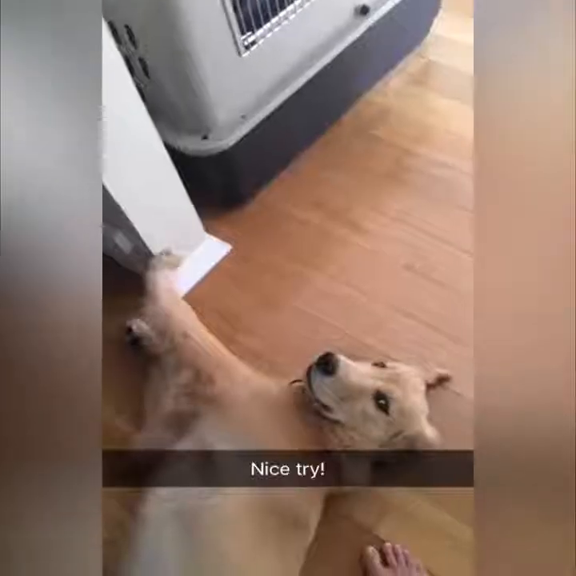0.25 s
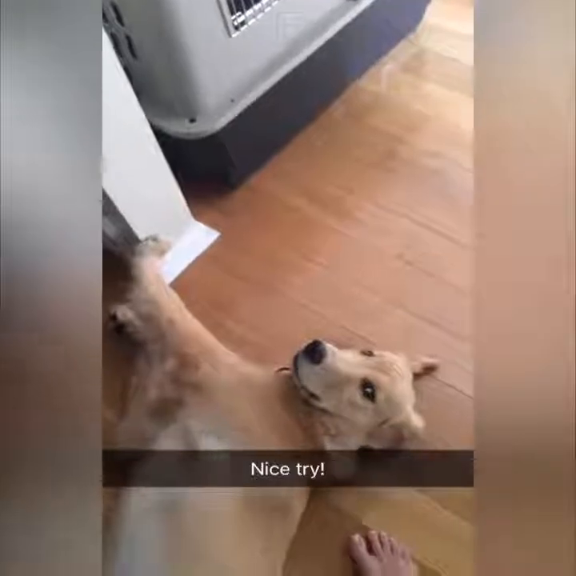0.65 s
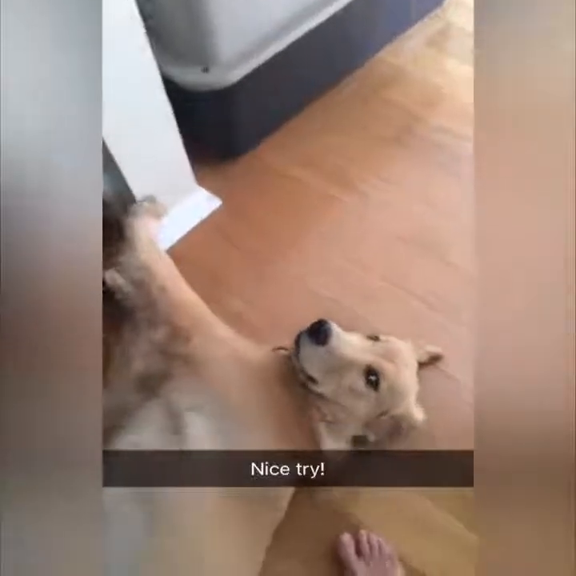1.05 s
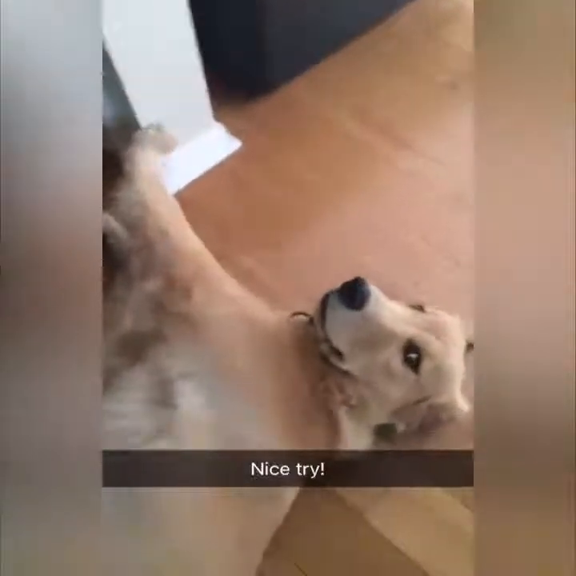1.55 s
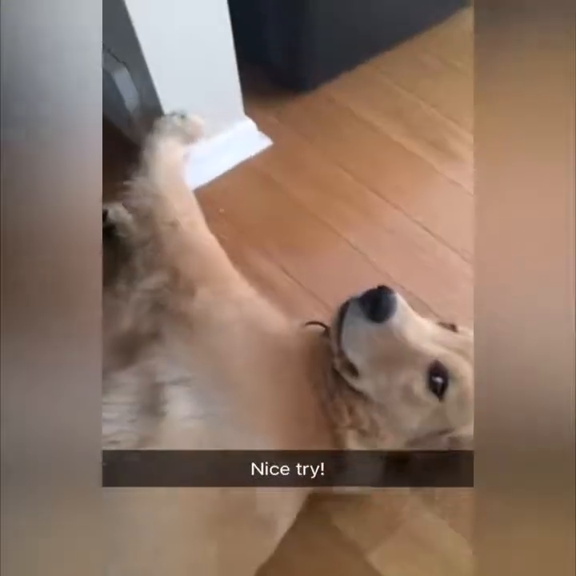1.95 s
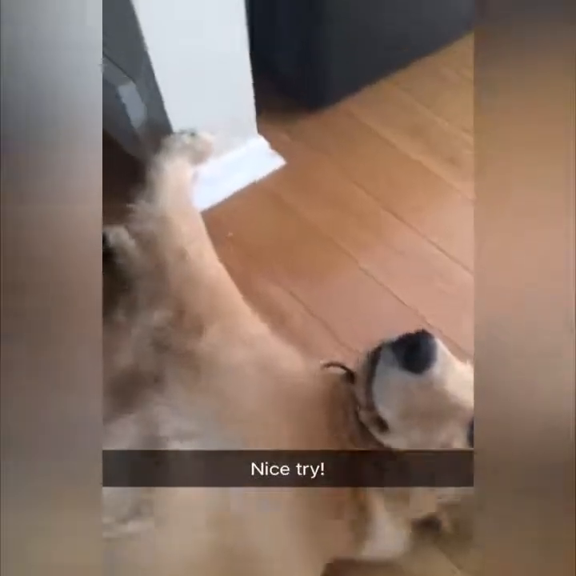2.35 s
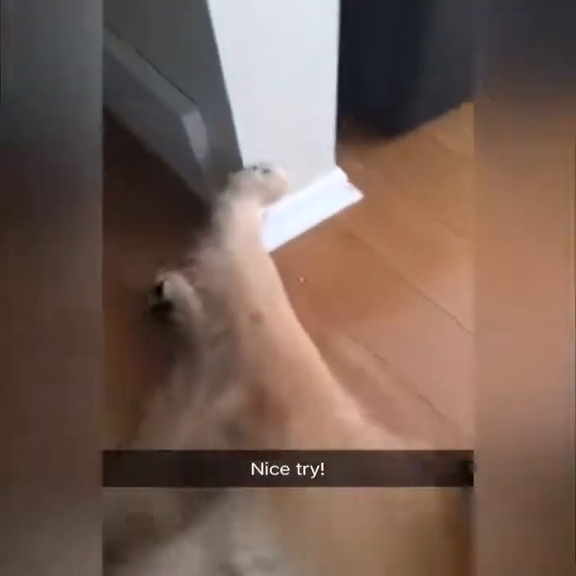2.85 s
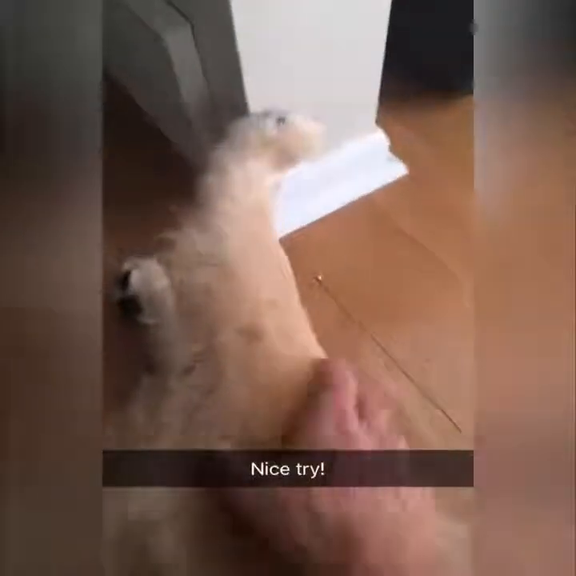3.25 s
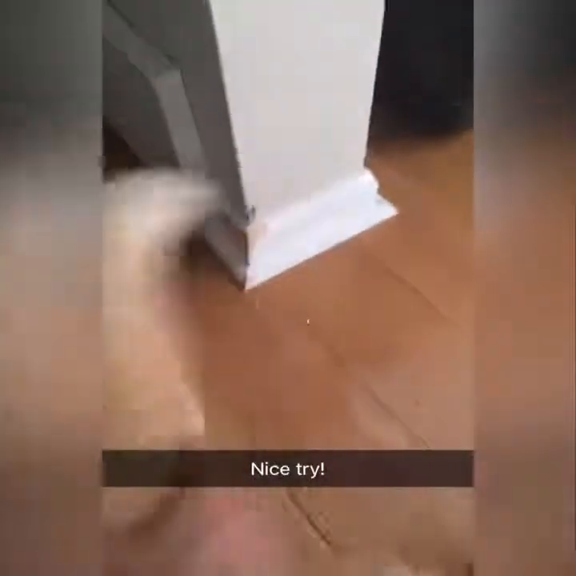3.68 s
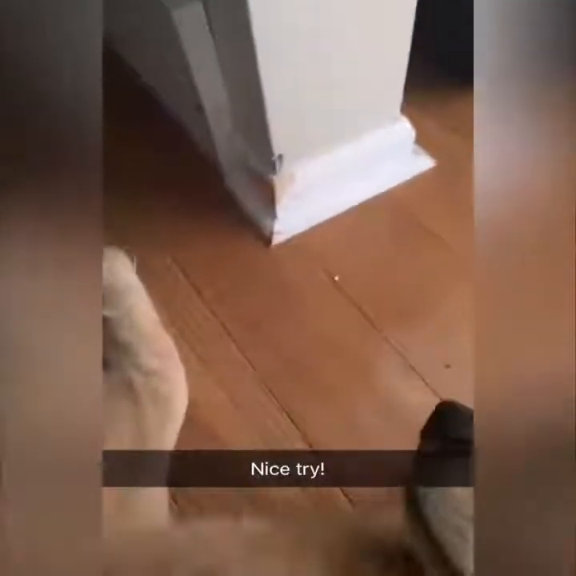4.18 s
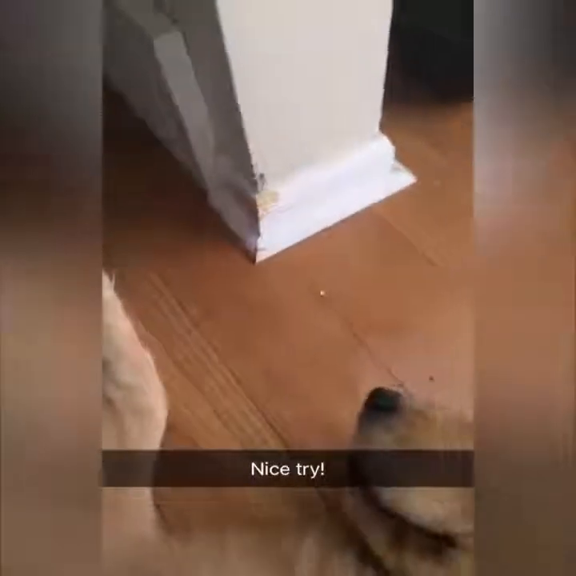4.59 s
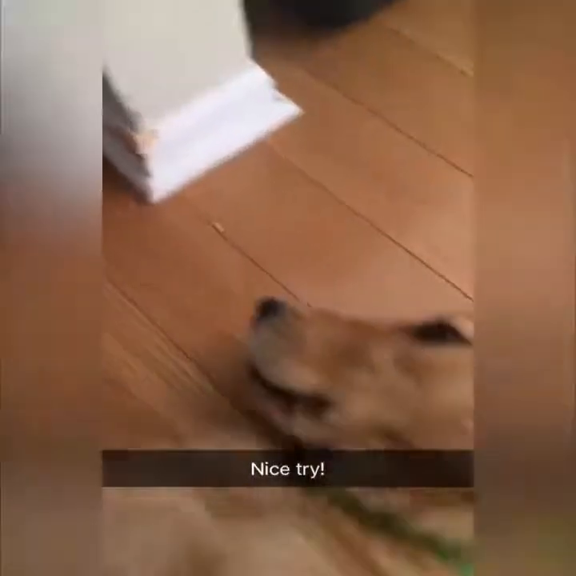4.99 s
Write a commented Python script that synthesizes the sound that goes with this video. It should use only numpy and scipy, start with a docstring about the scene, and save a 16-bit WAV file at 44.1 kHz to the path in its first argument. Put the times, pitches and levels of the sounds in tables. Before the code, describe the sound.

A dog's coat hisses along a hardwood floor in strokes, with tiny claw ticks, then sharp claw scratches and soft paw knocks indoors.

```python
"""A dog's coat hisses along a hardwood floor in strokes as the dog is rubbed and shifted about in a small room.
The hiss and the dull rumble of its weight are made of countless tiny random slips, each layer given its colour.
Claws scratch in short bursts of slips and tick as fast-dying tones; paws knock on the floor and the door frame
as low pulses with a thud. Short reflections, low room tones and quiet air noise surround it all."""
import sys
import numpy as np
from scipy import signal
from scipy.fft import rfft, irfft, next_fast_len
from scipy.io import wavfile

SR = 44100
rng = np.random.default_rng(int(sys.argv[2]) if len(sys.argv) > 2 else 0)


def to_wav(s):
    """Save 16-bit WAV."""
    ch = np.atleast_2d(s).T  # columns
    pcm = np.round(np.clip(ch, -1, 1) * 32767)  # PCM
    wavfile.write(sys.argv[1], SR, pcm.astype(np.int16))


N = 230508
TIME = np.arange(N) / SR  # seconds

# Quiet air of the room, spectrum: (pitch [Hz], relative level [dB])
AIR_SPECTRUM = [(40, -31), (90, -8), (160, 5.5), (240, 5), (340, -11.5), (600, -11), (1000, -2),
                (2000, -12.5), (5200, -13.5), (7500, -8), (11000, -44), (15000, -19)]

# The body dragging on the boards, before one shared trim: (time [s], level [dB])
DRAG_LEVELS = [(0.26, -49.5), (0.71, -47.5), (1.07, -50), (1.39, -47), (2.15, -48), (2.35, -52.5),
               (2.51, -50.5), (2.69, -50.5), (3.19, -61), (3.95, -62), (4.16, -64.5), (4.42, -68.5),
               (5.05, -65.5), (5.22, -59)]
# Spectra of the dragging weight and of the settling head: (pitch [Hz], relative level [dB])
RUMBLE_SPECTRUM = [(25, -29), (80, -28), (105, -19), (150, -3), (200, -7.5), (250, -0.5), (320, -1.5),
                   (400, -3.5), (560, -7), (780, -12.5), (1200, -32.5), (2000, -26)]
SETTLE_SPECTRUM = [(450, -12), (750, -8.5), (1150, -2), (1600, -5), (2200, -15), (4000, -19)]

# Strokes of the coat over the boards, each a push that builds, holds and lets go:
# (start [s], rise [s], hold [s], release [s], hiss [dB], coarse grit [dB], fine hair [dB])
COAT_STROKES = [ (0.39, 0.062, .01, 0.027, -52.5, -68, -60), (0.724, 0.055, 0.055, 1, -42.5, -59, -45.5),
                (0.765, 0.44, .24, 0.84, -33.5, -47, -55), (1.642, 0.082, 0.28, .25, -36, -46, -43.5),
                (2.07, 0.045, 0.037, .13, -57, -46, -51.5), (2.155, 0.028, 0.061, 0.44, -64.5, -59.5, -73),
                (2.48, 0.057, .015, 0.053, -37.5, -50, -50), (2.548, 0.033, 0.18, 0.044, -39.5, -44, -43),
                (2.758, 0.02, 0.43, 1, -52.5, -54, -50.5), (2.878, 0.055, 0.064, 0.054, -46, -57, -49.5),
                (3.225, 0.036, 0.21, 0.1, -56.5, -63, -51), (3.59, 0.11, .1, 0.67, -64.5, -65, -80),
                (3.741, 0.022, 0.011, .02, -44, -60, -45), (4.025, .03, 0.032, 0.044, -60, -68, -65),
                (4.555, 0.007, 0.017, 0.045, -63, -56.5, -57), (4.593, 0.024, 0.12, .1, -80, -73, -73),
                (4.688, .004, 0.0058, 0.021, -72, -77, -58), (4.798, 0.19, .25, .17, -66, -70.5, -64)]
# Faint stir of the coat between strokes: (hiss [dB], grit [dB], hair [dB])
RESTING_COAT_DB = [-69, -73.5, -76.5]
# Spectra of the coat's hiss, grit and fine hair, and of loose fur: (pitch [Hz], relative level [dB])
HISS_SPECTRUM = [(4500, -58), (5300, -11), (6200, -2), (7900, 6), (9200, 3.5), (10900, 2.5), (11400, -5.5),
                 (11900, -105)]
GRIT_SPECTRUM = [(600, -17), (900, -9.5), (1250, -11.5), (1600, -3), (2500, 0.5), (3500, -4.5),
                 (4400, -2.5), (5100, -8.5), (7000, -15)]
HAIR_SPECTRUM = [(7500, -51), (10000, 8.5), (11800, 6.5), (12600, 8), (14200, 8), (15500, 4)]
SWISH_SPECTRUM = [(900, -8), (1250, -15), (1750, -0.5), (2400, -3), (3400, -4.5), (5200, -6.5),
                  (6500, -1.5), (7900, 0), (10500, -3), (12500, -6.5), (15000, -15)]

# Dry ticks of a claw tip, before one shared boost: (start [s], level [dB], pitch of the wood [Hz])
CLAW_TICKS = [(0.8479, -26, 1970), (0.9030, -35, 1700), (0.9962, -28, 2320), (1.065, -29.5, 1210),
              (1.1136, -25, 2550), (1.1356, -26.5, 1570), (1.1590, -30.5, 1880), (1.194, -31.5, 2430),
              (1.5412, -33, 1620)]

# Paw knocks: (start [s], level [dB], pitch of the struck spot [Hz], time to the peak [s], dull thud [dB])
PAW_KNOCKS = [ (1.934, -42, 279, 0.009, -39), (2.588, -40, 225, 0.0069, -34.5),
              (2.639, -37, 189, 0.0083, -57), (2.725, -41.5, 170, 0.011, -57),
              (2.745, -30.5, 303, 0.0067, -63), (3.097, -46.5, 262, 0.011, -53),
              (3.134, -41.5, 175, 0.0054, -49.5), (3.823, -26.5, 160, 0.011, -38),
              (3.828, -53, 312, 0.0063, -68), (3.887, -54, 187, 0.018, -61),
              (4.534, -50.5, 500, 0.0022, -71), (4.559, -48.5, 1780, 0.0012, -70),
              (4.569, -53, 1900, .003, -66), (5.05, -43.5, 1130, 0.002, -52),
              (5.069, -49, 1120, 0.0047, -60), (5.141, -51, 1350, .0022, -54)]
# Dull thud under a knock, spectrum: (pitch [Hz], relative level [dB])
THUD_SPECTRUM = [(50, -25), (90, -29), (150, -5), (270, 8), (400, 0.5), (540, -0.5), (720, -23),
                 (1100, -17.5), (1600, -30), (3000, -57)]

# Claw scratches, with levels at full force: (start [s], rise [s], fall [s], claw [dB], claw pitch [Hz],
# nail ring [dB], nail pitch [Hz], board [dB])
CLAW_SCRATCHES = [ (1.937, 0.0013, 0.005, -25, 8900, -39, 4740, -31.5),
                  (2.583, 0.003, 0.0046, -27.5, 8800, -31, 3840, -34.5),
                  (2.637, 0.00063, 0.0025, -27.5, 7700, -61, 3640, -30.5),
                  (2.680, 0.012, 0.016, -37, 9600, -62, 4300, -42),
                  (2.726, 0.00023, 0.0044, -24.5, 8100, -30, 4180, -31),
                  (2.866, 0.013, 0.0067, -16.5, 8440, -46, 4730, -49.5),
                  (2.884, 0.021, 0.0097, -35, 9600, -50, 4500, -62),
                  (3.094, 0.0019, 0.01, -32, 9200, -47, 4400, -42),
                  (3.135, 0.017, 0.0068, -46, 10200, -49.5, 4300, -48),
                  (3.712, 0.023, .006, -45.5, 7900, -53.5, 4390, -82),
                  (3.732, 0.018, 0.012, -31.5, 7900, -48, 4470, -68),
                  (3.746, 0.016, 0.0073, -34, 9600, -48.5, 4500, -67),
                  (3.829, .0015, 0.0054, -60, 7500, -41, 4800, -69),
                  (4.508, .0012, 0.0036, -45, 8040, -62, 4500, -76),
                  (4.559, 0.001, 0.014, -44.5, 7000, -54.5, 5750, -64),
                  (4.69, 0.002, 0.0033, -46, 9800, -44.5, 4330, -72),
                  (4.963, 0.0055, 0.011, -43, 9200, -74, 4500, -80),
                  (5.153, 0.00061, 0.0029, -35, 6700, -47, 4450, -67),
                  (5.165, 0.0036, 0.0088, -48, 7100, -54, 4240, -56)]
# Spectra of the scraping claw and the board under it: (pitch [Hz], relative level [dB])
SCRAPE_SPECTRUM = [(4800, -28), (6200, 3), (7500, 5), (10800, 6.5), (11500, 10), (12000, -24), (14500, 1),
                   (16000, -19)]
BOARD_SPECTRUM = [(300, 25), (700, 19.5), (1150, 17.5), (1450, 14), (2100, 17), (2900, 19.5), (3900, -16),
                  (5200, -26), (7000, -19)]
# Nail ring, shifted to each scratch's nail pitch: (pitch for a 4500 Hz nail [Hz], relative level [dB])
NAIL_SPECTRUM = [(3400, -18.5), (3900, -9), (4500, 0), (4850, -3), (5200, -20), (5900, -11), (6600, -22),
                 (8000, -33)]
NAIL_HZ = 4500

# Low tones of floor and room: (pitch [Hz], width [Hz])
LOW_MODES = [(238, 7), (271, 9), (308, 15)]
# How strongly each low tone answers, in the same order: (level [dB])
LOW_MODE_LEVELS = [8.5, -4.5, -2.5]


def from_db(db):
    """Turn decibels into a gain."""
    return 10 ** (np.asarray(db) / 20)


def rms_one(x):
    """Scale a sound to an average strength (rms) of 1."""
    return x / np.sqrt(np.mean(x ** 2) + 1e-20)


def colour(x, spectrum):
    """Give x a spectrum that falls away beyond its ends, at rms 1."""
    hz, db = np.transpose(spectrum)
    size = next_fast_len(len(x))
    log_hz = np.log(np.maximum(np.fft.rfftfreq(size, 1 / SR), 1))
    outside = np.abs(log_hz - np.clip(log_hz, np.log(hz[0]), np.log(hz[-1])))
    curve_db = np.interp(log_hz, np.log(hz), db) - 40 * outside
    shaped = irfft(rfft(x, size) * from_db(curve_db), size)
    return rms_one(shaped[:len(x)])


def resonate(x, hz, width_hz):
    """Ring at one pitch, with a gain of about 1 at the peak; a narrow width rings longer."""
    r = np.exp(-np.pi * width_hz / SR)
    feed = np.array([1, 0, -1]) * (1 - r * r) / 2
    feedback = [1, -2 * r * np.cos(2 * np.pi * hz / SR), r * r]
    return signal.lfilter(feed, feedback, x + 1e-18)


def drift(rate_hz):
    """Wander slowly at random, with rms 1; a higher rate wanders faster."""
    hz = np.fft.rfftfreq(N, 1 / SR)
    slow = rfft(rng.standard_normal(N)) / (1 + (hz / rate_hz) ** 2)
    return rms_one(irfft(slow, N))


def friction(slips_per_s, spread_db):
    """Rubbing as countless tiny slips of uneven size, at random moments and in either direction."""
    sizes = from_db(spread_db * np.minimum(rng.exponential(1, N), 4))
    direction = rng.choice([-1, 1], N)
    happens = rng.random(N) < slips_per_s / SR
    return rms_one(sizes * direction * happens)


def patchy(x, depth_db, width_hz, hold_s):
    """The contact spot moves, so resonances come and go at random across the spectrum."""
    hz, s, spectrogram = signal.stft(x, SR, nperseg=512)
    field = rng.standard_normal(spectrogram.shape)
    # smooth the random field across pitch, then across time
    for axis, reach in enumerate((width_hz / hz[1], hold_s / s[1])):
        field = signal.filtfilt([1], [1, -np.exp(-1 / reach)], field, axis=axis, padtype=None)
    gain = from_db(depth_db * np.clip(rms_one(field), -2, 2))
    return rms_one(signal.istft(spectrogram * gain, SR, nperseg=512)[1][:N])


def swell(start, rise, hold, release):
    """Force of a push, timed in seconds: it builds evenly, holds, then eases off to nothing."""
    t = TIME - start
    build = np.clip(t / rise, 0, 1)
    let_go = np.clip(1 - (t - rise - hold) / release, 0, 1) ** 2
    return build * let_go


def event_time(start, length):
    """Samples that an event covers (length in samples), and the seconds since its start."""
    first = int(start * SR)
    span = slice(first, first + length)
    return span, np.maximum(TIME[span] - start, 0)


def air():
    """Quiet room noise, with noise through two low resonances as a wavering drone."""
    drone = resonate(rng.standard_normal(N), 235.7, width_hz=22)
    drone = rms_one(resonate(drone, 219, width_hz=35))
    hush = colour(rng.standard_normal(N), AIR_SPECTRUM)
    return from_db(-66.5) * hush + from_db(-66.5) * drone


def drag():
    """The dog's weight rumbles on the boards as it slips; the head settles with a soft, uneven shuffle."""
    drag_s, drag_db = np.transpose(DRAG_LEVELS)
    trim_db = -1
    rumble_db = np.interp(TIME, drag_s, drag_db) + trim_db + 0.76 * drift(36)
    rumble = colour(friction(slips_per_s=2300, spread_db=-1.0), RUMBLE_SPECTRUM)
    shuffle = colour(friction(slips_per_s=1100, spread_db=1.0), SETTLE_SPECTRUM)
    shuffle_force = swell(start=5.02, rise=0.068, hold=0.08, release=0.22)
    shuffle_db = -58.5 + 1.2 * drift(50)
    return from_db(rumble_db) * rumble + shuffle_force * from_db(shuffle_db) * shuffle


def stroke_levels():
    """Levels of hiss, grit and hair in dB; overlapping strokes add their energy."""
    forces = np.array([swell(*row[:4]) for row in COAT_STROKES])
    gains = from_db([row[4:] for row in COAT_STROKES])
    resting = from_db(RESTING_COAT_DB)[:, None]
    return 10 * np.log10(gains.T ** 2 @ forces ** 2 + resting ** 2)


def coat():
    """Hairs slip over the wood, and uneven pressure flutters each stroke; loose fur brushes lightly."""
    hiss_db, grit_db, hair_db = stroke_levels()
    pressure_db = 1.02 * drift(30)  # shared by hiss, grit and hair
    hiss = colour(friction(slips_per_s=14000, spread_db=2.0), HISS_SPECTRUM)
    hiss = patchy(hiss, depth_db=1.4, width_hz=41, hold_s=0.0037)
    grit = colour(friction(slips_per_s=7000, spread_db=1.0), GRIT_SPECTRUM)
    grit = patchy(grit, depth_db=4.0, width_hz=13, hold_s=0.02)
    hair = colour(friction(slips_per_s=4800, spread_db=1.5), HAIR_SPECTRUM)
    hair = patchy(hair, depth_db=-2.0, width_hz=90, hold_s=0.022)
    pressed = from_db(hiss_db) * hiss
    pressed += from_db(grit_db + 0.18 * drift(36)) * grit
    pressed += from_db(hair_db + 1.7 * drift(27)) * hair

    # a light brushing swish of loose fur lasts about a second, then fades under the strokes
    swish = colour(rng.standard_normal(N), SWISH_SPECTRUM)
    swish = patchy(swish, depth_db=1.5, width_hz=51, hold_s=0.018)
    brush_force = swell(start=0.015, rise=0.016, hold=1, release=0.87)
    brush_db = -52 + 1.7 * drift(17)
    return from_db(pressure_db) * pressed + brush_force * from_db(brush_db) * swish


def ticks():
    """A claw creeps over the wood: faint crackle, and a few snaps that ring for about a millisecond."""
    crackle = rms_one(resonate(friction(slips_per_s=620, spread_db=4.5), 1000, width_hz=1000))
    out = swell(start=0.69, rise=0.26, hold=0.22, release=0.9) * from_db(-53) * crackle
    boost_db = 4.5
    for start, db, hz in CLAW_TICKS:
        span, t = event_time(start, SR // 50)
        wood = np.sin(2 * np.pi * hz * t) * np.exp(-t / 0.00035)
        varnish = np.sin(2 * np.pi * 3100 * t) * np.exp(-t / 0.00026)
        claw = np.sin(2 * np.pi * 10000 * t) * np.exp(-t / 0.00024)
        out[span] += from_db(db + boost_db) * (wood + 0.25 * varnish + 1.1 * claw)
    thin = signal.butter(2, 900, "high", fs=SR, output="sos")
    return signal.sosfilt(thin, out)


def knocks():
    """A soft pad pushes the wood into a few cycles of its local note and damps it, with a dull thud."""
    thud = colour(rng.standard_normal(N), THUD_SPECTRUM)
    out = np.zeros(N)
    for start, db, hz, peak_s, thud_db in PAW_KNOCKS:
        span, t = event_time(start, SR // 10)
        push = t / peak_s * np.exp(0.5 * (1 - (t / peak_s) ** 2))
        note = push * np.sin(2 * np.pi * hz * t)
        dull = rms_one(push * thud[span]) * np.sqrt(np.mean(push ** 2))
        out[span] += from_db(db) * note + from_db(thud_db) * dull
    return out


def scratches():
    """A claw bites, chatters ever harder, then lets go; claw, nail and board sound with the slips."""
    slips = friction(slips_per_s=11000, spread_db=0.0)
    scrape = patchy(colour(slips, SCRAPE_SPECTRUM), depth_db=-5.5, width_hz=38, hold_s=0.044)
    board = colour(friction(slips_per_s=8500, spread_db=2.0), BOARD_SPECTRUM)
    out = np.zeros(N)
    for start, rise, fall, claw_db, claw_hz, nail_db, nail_hz, board_db in CLAW_SCRATCHES:
        span, t = event_time(start, SR // 5)
        force = np.minimum(t / rise, 1) * np.exp(-np.maximum(t - rise, 0) / fall)
        claw = 0.053 * scrape[span] + resonate(scrape[span], claw_hz, width_hz=1160)
        shifted = [(hz * nail_hz / NAIL_HZ, db) for hz, db in NAIL_SPECTRUM]
        nail = colour(slips[span], shifted)
        for db, part in ((claw_db, claw), (nail_db, nail), (board_db, board[span])):
            # each part takes up energy in step with the force
            out[span] += from_db(db) * rms_one(force * part) * np.sqrt(np.mean(force ** 2))
    return out


def room(x):
    """Dense reflections from near walls, dying away, thin in the bass and a little dull on top."""
    t = TIME[:SR // 2]
    fade_60db_s = 0.15  # time for the reflections to drop by 60 dB
    first_wall = t > 0.004
    tail = rng.standard_normal(len(t)) * from_db(-60 * t / fade_60db_s) * first_wall
    band = signal.butter(1, [350, 11000], "band", fs=SR, output="sos")
    tail = signal.sosfilt(band, tail)
    return signal.fftconvolve(x, tail / np.sqrt(np.sum(tail ** 2)))[:N]


def low_modes(pushes):
    """Floor and room ring at a few low pitches when pushed."""
    boom = np.zeros(N)
    for (hz, width_hz), db in zip(LOW_MODES, LOW_MODE_LEVELS):
        boom += from_db(db) * resonate(pushes, hz, width_hz)
    return boom


def scene():
    """Contacts ring on in the room, and they and the rumble feed its low tones; both channels are alike."""
    contacts = scratches() + knocks() + ticks()
    rumble = drag()
    boom = low_modes(rumble + from_db(3) * contacts)
    mono = coat() + rumble + contacts + boom + from_db(-10) * room(contacts) + air()
    return np.stack([mono, mono])


def record(dry):
    """After a brief silence the sound fades in quickly; the top above 15200 Hz is cut steeply."""
    opening = np.clip((TIME - 0.052) / 0.018, 0, 1)
    top_cut = signal.ellip(12, 0.1, 80, 15200, fs=SR, output="sos")
    return signal.sosfilt(top_cut, dry * opening)


dry = scene()
out = record(dry)
to_wav(out)
```